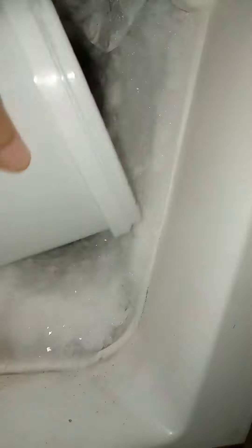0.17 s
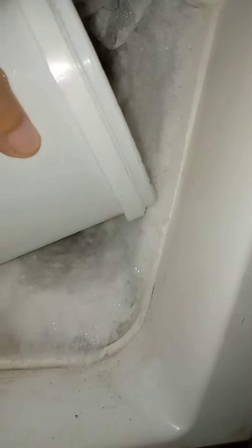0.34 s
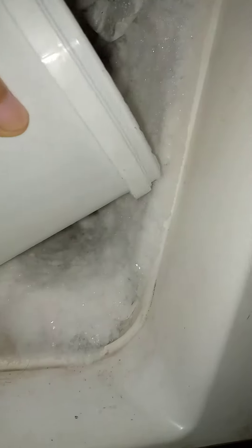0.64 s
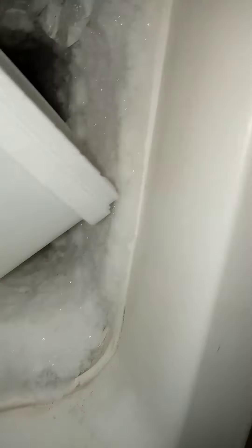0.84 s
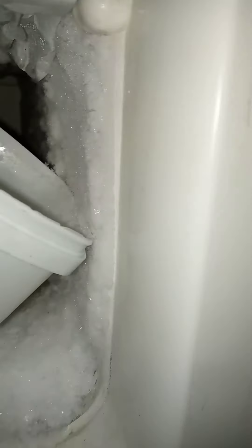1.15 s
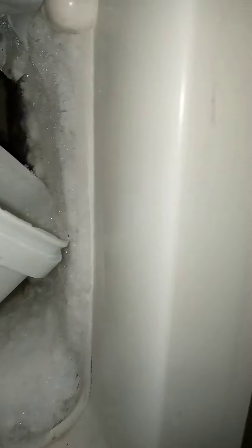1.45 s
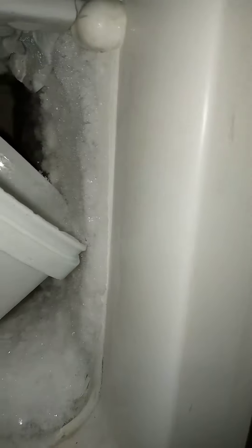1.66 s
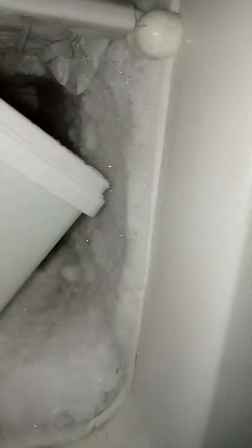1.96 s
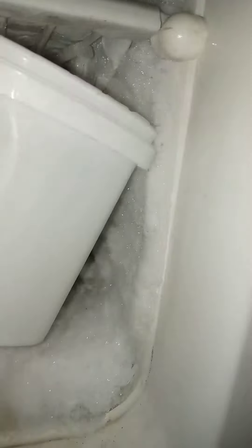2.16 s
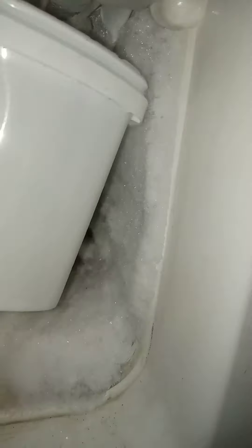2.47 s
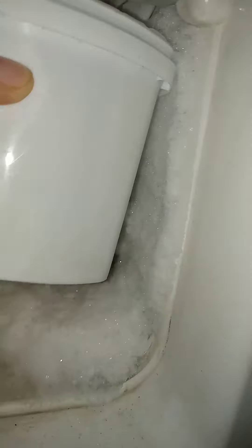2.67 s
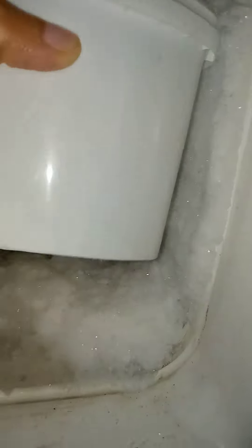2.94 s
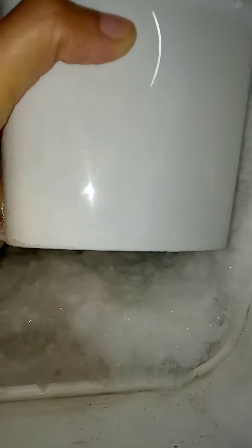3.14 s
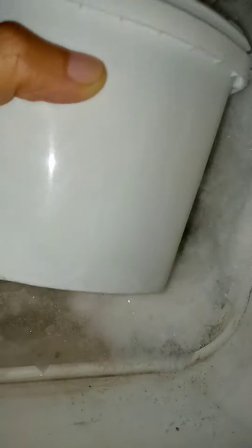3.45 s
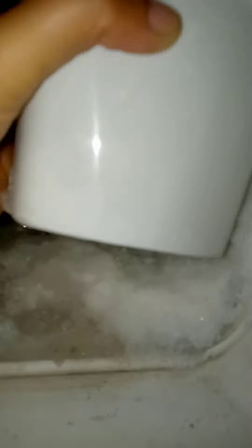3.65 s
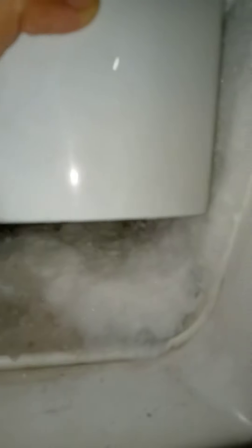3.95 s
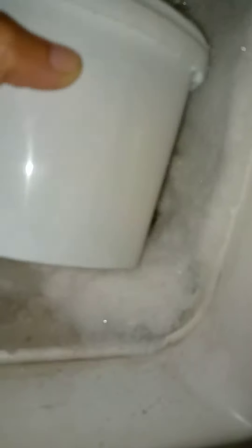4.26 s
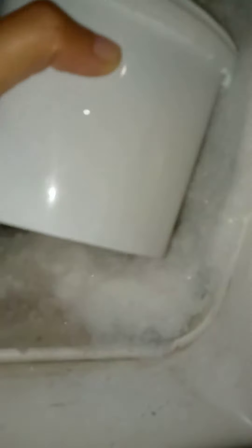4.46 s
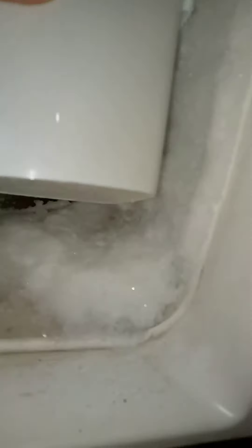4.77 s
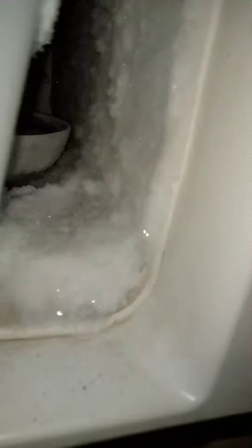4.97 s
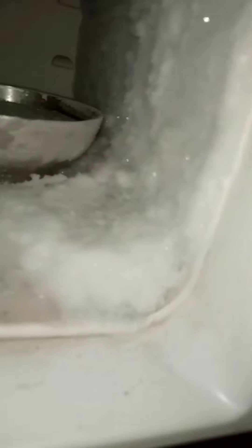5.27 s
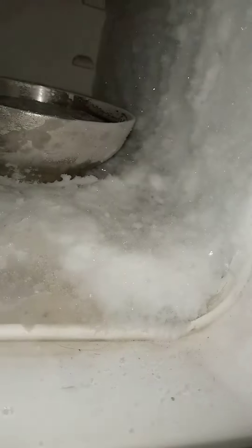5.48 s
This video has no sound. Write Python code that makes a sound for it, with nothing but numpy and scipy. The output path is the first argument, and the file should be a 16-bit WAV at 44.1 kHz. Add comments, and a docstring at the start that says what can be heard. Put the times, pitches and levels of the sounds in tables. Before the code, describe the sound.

Close, gritty bursts of plastic rim crushing ice, with hollow knocks, scattered crumb ticks and quiet pauses above a soft low background hum.

```python
"""Inside a freezer, close to a phone, a light crackling drag of a plastic tub is fading as the scene opens.
Then the tub goes in jerks over thick frost: its rim crushes ice (clumped noise through resonances),
crystals and crumbs tick (short decays), and the hollow tub hums and knocks on solid ice (pushed modes).
Near the end a steel bowl is touched (decaying sines). Throughout, the kitchen answers with decaying
noise, over a steady low hush of air and far machines (coloured noise)."""
import sys
import numpy as np
from scipy import signal
from scipy.fft import rfft, irfft, next_fast_len
from scipy.io import wavfile
from scipy.ndimage import uniform_filter1d, map_coordinates

SR = 44100
rng = np.random.default_rng(int(sys.argv[2]) if len(sys.argv) > 2 else 0)


def wav_out(sig):
    """Save sig, one row per channel (or a flat mono array), as 16-bit PCM at SR to the path in sys.argv[1]."""
    wavfile.write(sys.argv[1], SR, np.round(np.clip(np.atleast_2d(sig).T, -1, 1) * 32767).astype(np.int16))


N = 247401  # samples

# All levels are relative; each source is balanced where it is mixed.
# Pressure of the rim on the frost, one curve per stroke: (time [s], level [dB])
STROKE_CURVES = [
    [(1.818, -36), (1.826, -26.5), (1.84, -26.5), (1.87, -41.5)],
    [(2.178, -53), (2.186, -38.5), (2.226, -34.5), (2.243, -50)],
    [(2.265, -43.5), (2.295, -33.5), (2.325, -35), (2.35, -47.5)],
    [(2.665, -47), (2.689, -37.5), (2.699, -25.5), (2.707, -22.5), (2.717, -40.5), (2.748, -39.5)],
    [(2.756, -31), (2.762, -32), (2.77, -24.5), (2.782, -62)],
    [(2.838, -47), (2.872, -38), (2.888, -65)],
    [(2.915, -46), (2.921, -63), (2.935, -34), (2.945, -55)],
    [(3.712, -40), (3.734, -26.5), (3.752, -40.5), (3.758, -32.5), (3.766, -27.5), (3.772, -51)],
    [(3.778, -46), (3.786, -31.5), (3.798, -40), (3.862, -33.5), (3.868, -59)],
    [(4.405, -58), (4.417, -30.5), (4.441, -31), (4.461, -34), (4.47, -50)],
    [(5.488, -50), (5.5, -35.5), (5.506, -34), (5.515, -60)],
    [(5.573, -24.5), (5.578, -27.5), (5.586, -48), (5.594, -33), (5.608, -46)],
    [(0.236, -30), (0.24, -26), (0.272, -26), (0.278, -40), (0.284, -26.5), (0.315, -53.5)],
    [(0.482, -35), (0.49, -29.5), (0.526, -22.5), (0.54, -31), (0.545, -42)],
    [(2.588, -49.5), (2.622, -29.5), (2.632, -47), (2.64, -31.5), (2.654, -26.5), (2.662, -48)],
    [(3.028, -38), (3.036, -31), (3.07, -41.5), (3.082, -33), (3.118, -43.5), (3.125, -62)],
    [(4.515, -55), (4.535, -35), (4.579, -35.5), (4.589, -43), (4.599, -35.5), (4.639, -33.5), (4.66, -49)],
    [(5.165, -56), (5.169, -49.5), (5.187, -55), (5.203, -42.5), (5.213, -49), (5.221, -48), (5.255, -54.5),
     (5.258, -59)],
]
# The rim brushes the frost lightly: (time [s], length [ms], level [dB])
LIGHT_BRUSHES = [(.045, 31, -59), (0.193, 16.5, -49.5), (0.366, 2.4, -43), (0.576, 4, -38),
                 (0.591, 8.2, -46.5), (0.75, 10, -52), (1.197, 18, -59.5), (1.226, 24, -56),
                 (2.115, 9, -49), (3.172, 52, -48.5), (3.318, 5.1, -40.5), (4.316, 7.8, -48.5),
                 (4.375, 28, -52.5), (4.824, 14, -50), (4.88, 9.9, -42.5)]
BRUSH_RISE_MS, BRUSH_FALL_MS = 7, 3.7  # to climb 14 dB, to drop 12 dB
# Crystals snap or crumbs land: (time [s], level [dB], 60 dB decay [ms])
CRYSTAL_SNAPS = [(0.025, -48, 11), (0.085, -41, 21), (0.222, -23, 22), (0.24, -43, 17), (0.298, -36, 13),
                 (0.348, -41, 15), (0.355, -49, 15), (0.447, -33, 24), (0.475, -31.5, 15.5),
                 (.536, -25.5, 11), (0.72, -49.5, 22), (0.848, -45, 10), (0.855, -45, 32), (0.965, -39, 21),
                 (.976, -37.5, 12), (0.983, -41, 13), (1, -49, 18), (1.03, -56, 10), (1.078, -67, 16),
                 (1.007, -38, 16), (1.49, -56, 48), (1.62, -52.5, 24), (1.683, -55.5, 24),
                 (1.808, -22.5, 23), (1.92, -46.5, 29), (1.937, -45, 26), (2.728, -36, 6.8),
                 (2.76, -29.5, 35), (2.895, -24.5, 65), (2.985, -32.5, 19), (3.02, -29.5, 43),
                 (3.332, -44.5, 19), (3.757, -38, 25), (3.898, -40.5, 16), (4.02, -40, 12.3),
                 (4.258, -44.5, 31), (4.298, -35.5, 24), (4.602, -41, 18), (4.752, -37, 9.3),
                 (4.759, -35.5, 11), (5.432, -39, 38.5), (5.543, -39, 36), (5.563, -27, 25)]
# The touching spot favours a pitch and shakes rim and wall more or less:
# (time [s], favoured pitch [Hz], rim level [dB], wall level [dB])
CONTACT_SPOT = [(.1, 2470, -8.5, 2.5), (.3, 2300, -3.5, 0.5), (.52, 2260, -5.5, 0), (.98, 4780, -9, -4.5),
                (1.22, 2880, -5, 4), (1.82, 1880, -3.5, 3.5), (2.3, 2670, -3.5, 0.5), (2.7, 3190, -6, 0.5),
                (3.04, 2570, -2.5, 3.5), (3.32, 2690, -1, 5.5), (3.749, 2980, -4, 2),
                (3.86, 2570, -3.5, 5.5), (4.26, 2500, -0.5, 5.5), (4.43, 2450, -5.5, -1.5),
                (4.62, 2340, -1.5, 5.5), (4.88, 2330, -1, 6.5), (5.2, 2470, -1, 2), (5.434, 1600, 5.5, 6.5),
                (5.56, 2540, -3.5, 2.5)]
# Spectrum of breaking crystals: (frequency [Hz], level per Hz [dB])
ICE_SPECTRUM = [(1000, -77.5), (1200, -25), (5500, 2.5)]
# Highest treble of the crunch: (time [s], level [dB])
SHEEN_LEVEL = [(4.8, -12), (5.2, 3.5), (5.5, 4.5), (5.56, -1)]
SHEEN_HZ = 11700
# Modes of the tub rim: (frequency [Hz], width [Hz], level [dB])
RIM_MODES = [(1434, 480, 2), (1884, 494, 0.5), (2880, 181, -4), (3235, 587, 4.5), (4670, 496, 8)]
# Modes of the tub wall: (frequency [Hz], width [Hz], level [dB])
WALL_MODES = [(448, 78, 2), (646, 124, -2), (742, 20, -1.5)]
# Modes of the air and floor of the tub: (frequency [Hz], width [Hz], level [dB])
BOOM_MODES = [(140.2, 6.1, 0.5), (187, 47, -11)]
# The tub wall bumps solid ice: (time [s], boom level [dB], knock level [dB], favoured pitch [Hz])
ICE_BUMPS = [(0.223, -67, -21.5, 547), (0.2409, -37.5, -21.5, 490), (1.809, -63, -19.5, 506),
             (2.708, -41.5, -19.5, 510), (2.763, -52, -18, 774), (2.794, -43.5, -50.5, 450),
             (2.899, -38, -20, 720), (3.039, -35, -19.5, 665), (3.86, -39.5, -60, 556),
             (4.636, -33, -30, 466), (4.877, -47, -29.5, 466), (5.169, -50, -55, 450),
             (5.564, -37.5, -19, 674)]
# Touches on the steel bowl: (time [s], level [dB])
BOWL_TOUCHES = [(5.435, -56), (5.503, -60)]
# Tones of the steel bowl: (frequency [Hz], level [dB], 60 dB decay [s])
BOWL_TONES = [(6340, -3, .15), (10400, 11, .045), (11960, 15, .05)]
# Decay of the kitchen's answer: (frequency [Hz], 60 dB decay [s])
KITCHEN_DECAY = [(300, 1), (2000, 1), (3800, 0.34), (7000, 0.55), (14000, 0.48)]
# Spectrum of air and far machines: (frequency [Hz], level per Hz [dB])
HUSH_SPECTRUM = [(25, -30), (121, 8.5), (168, -2.5), (267, 7.5), (603, 4), (1130, -6), (2100, -9),
                 (2920, -18.5), (4300, -22.5), (7000, -24), (16000, -36)]
# Slow course of the hush: (time [s], level [dB])
HUSH_LEVEL = [(0, -54), (1.5, -58), (3.5, -57.5), (5.3, -57.5)]
# Response of the phone microphone: (frequency [Hz], gain [dB])
MIC_RESPONSE = [(4200, 0.5), (5800, 5), (7000, 11), (8200, -2.5), (10900, -17), (13500, -13), (14500, 2),
                (15600, 10), (16100, -34)]
TOP_HZ = 16800  # band limit of the microphone
CLOCK = np.arange(N) / SR  # [s]


def amp(db):
    """Amplitude factor of a level in dB."""
    return 10 ** (np.asarray(db) / 20)


def unit(x):
    """Scale a signal to rms 1."""
    return x / np.sqrt(np.mean(x ** 2) + 1e-20)


def along(points, hz):
    """Read (Hz, value) points on a log frequency axis."""
    f, values = np.transpose(points)
    return np.interp(np.log(hz + 1), np.log(f + 1), values)


def over_time(points):
    """Draw (s, value) points as straight lines over the whole scene."""
    s, values = np.transpose(points)
    return np.interp(CLOCK, s, values)


def filtered(x, response):
    """Pass x through a complex response of frequency."""
    m = next_fast_len(N + SR // 2)
    spectrum = rfft(x, m) * response(np.fft.rfftfreq(m, 1 / SR))
    return irfft(spectrum, m)[..., :N]


def causal(points):
    """Minimum-phase response of (Hz, dB) points, from a folded cepstrum."""
    def response(hz):
        cepstrum = irfft(np.log(amp(along(points, hz))))
        half = len(cepstrum) // 2
        cepstrum[1:half] *= 2
        cepstrum[half + 1:] = 0
        return np.exp(rfft(cepstrum))
    return response


def modes(table):
    """Response of (Hz, width, dB) resonances of one body; they cancel each other in between."""
    def response(f):
        return sum(amp(db) * 1j * f * width / (hz * hz - f * f + 1j * f * width)
                   for hz, width, db in table)
    return response


def wobble(rate):
    """A smooth random curve with rate knots a second."""
    knots = rng.standard_normal(int(N * rate / SR) + 4)
    return map_coordinates(knots, [np.arange(N) * rate / SR])


def patchy(patchy_db, bins, frames):
    """Noise of rms 1 whose colour changes at random from patch to patch."""
    z = signal.stft(rng.standard_normal(N), nperseg=256)[2]
    field = uniform_filter1d(rng.standard_normal(z.shape), size=bins, axis=0)
    field = uniform_filter1d(field, size=frames, axis=1)
    return unit(signal.istft(z * amp(patchy_db * unit(field)), nperseg=256)[1][:N])


def add(line, s, piece):
    """Lay a piece onto the line, starting at s seconds."""
    part = line[max(round(s * SR), 0):][:len(piece)]
    part += piece[:len(part)]


def rung(force, grain, response):
    """Press grain with a force into a response, at the level of the force."""
    return filtered(force * grain, response) / np.std(filtered(grain, response))


def pressure():
    """Force of the contact as felt by the crystals, the rim and the tub wall."""
    rub, snap = np.zeros(N), np.zeros(N)
    for stroke in STROKE_CURVES:
        s, db = np.transpose(stroke)
        rub += amp(np.interp(CLOCK, s, db)) * (CLOCK >= s[0]) * (CLOCK < s[-1])
    for s, length_ms, db in LIGHT_BRUSHES:
        ms = (CLOCK - s) * 1000
        rise_db = 14 * np.minimum(ms, 0) / BRUSH_RISE_MS
        fall_db = 12 * np.maximum(ms - length_ms, 0) / BRUSH_FALL_MS
        rub += amp(db + rise_db - fall_db)
    t = np.arange(SR // 10) / SR
    for s, db, t60_ms in CRYSTAL_SNAPS:
        add(snap, s, amp(db - 60 * 1000 * t / t60_ms))
    s, _, rim_db, wall_db = np.transpose(CONTACT_SPOT)
    crunch = rub + amp(5) * snap
    ring = amp(np.interp(CLOCK, s, rim_db)) * (rub + amp(4.0) * snap)
    shake = amp(np.interp(CLOCK, s, wall_db)) * (rub + amp(2.0) * snap)
    # loosened frost keeps trickling after a bite, fading over about 1/8 s
    loose = signal.lfilter([8 / SR], [1, 8 / SR - 1], crunch)
    landings = (rng.random(N) < 130 / SR) * rng.random(N)  # about 130 crumbs a second
    crumbs = abs(signal.fftconvolve(landings, amp(-60 * t / 0.0049))[:N])
    # a light, crackling drag is fading as the scene opens
    drag = amp(-53.5 - 60 * CLOCK / 2.9) * (0.68 + 6 * crumbs)
    return crunch + drag + amp(-4.5) * loose * crumbs, ring + amp(-5.5) * drag, shake


def scrape():
    """Crystals break in clumps a few milliseconds long and ring the rim; jerks shake the tub wall."""
    crunch, ring, shake = pressure()
    clumps = amp(2.5 * wobble(350) + 2.5 * wobble(2500))
    grit = unit(clumps * patchy(patchy_db=2.0, bins=4, frames=4))
    crystals = rung(crunch, grit, causal(ICE_SPECTRUM))
    treble = filtered(crystals, lambda hz: 1 / (1 + (SHEEN_HZ / (hz + 1)) ** 10))
    crystals = crystals + (amp(over_time(SHEEN_LEVEL)) - 1) * treble

    s, pitch_hz, _, _ = np.transpose(CONTACT_SPOT)
    contact_hz = np.interp(CLOCK, s, pitch_hz)
    rim = 0
    for hz, width, db in RIM_MODES:
        # a mode weakens with each octave between it and the favoured pitch, and flickers
        near_db = db - 9 * abs(np.log2(hz / contact_hz)) + 2.3 * wobble(40)
        narrow, wide = modes([(hz, width, 0)]), modes([(hz, 4 * width, 0)])
        rim = rim + rung(ring * amp(near_db), grit, lambda f: narrow(f) * wide(f))

    jerks = unit(clumps * rng.standard_normal(N))
    # a rubbed wall gives little outside its modes
    steep = signal.butter(4, [300, 830], "band", fs=SR, output="sos")
    wall = rung(shake, jerks, lambda hz: modes(WALL_MODES)(hz) * signal.sosfreqz(steep, hz, fs=SR)[1])
    boom = rung(shake, jerks, modes(BOOM_MODES))
    return amp(-1.0) * crystals + amp(-4.5) * rim + amp(-6.0) * wall + amp(-16.0) * boom


def bumps():
    """A soft push about a millisecond long rings the tub; the hand on it makes the hum waver."""
    low, knock = np.zeros(N), 0
    push = np.hanning(round(0.0015 * SR))
    for s, boom_db, _, _ in ICE_BUMPS:
        add(low, s, amp(boom_db + 36.5) * push)
    for hz, width, db in WALL_MODES:
        high = np.zeros(N)
        for s, _, knock_db, near_hz in ICE_BUMPS:
            # a mode weakens with each octave from the favoured pitch
            add(high, s, amp(knock_db + 16 - 32 * abs(np.log2(hz / near_hz))) * push)
        knock = knock + filtered(high, modes([(hz, width, db)]))
    hum = amp(0.83 * wobble(17)) * filtered(low, modes(BOOM_MODES))
    return hum + knock


def bowl():
    """The steel bowl rings briefly as decaying sines, damped by the frost it sits in."""
    out, t = np.zeros(N), np.arange(SR // 5) / SR
    for s, db in BOWL_TOUCHES:
        for hz, level_db, t60 in BOWL_TONES:
            # each touch excites the tones a little differently
            tone_db = db + level_db + rng.normal(0, 2.5) - 60 * t / t60
            add(out, s, amp(tone_db) * np.sin(2 * np.pi * hz * t))
    return out


def kitchen(x):
    """Diffuse answer: the energy at each frequency dies at its own speed, carried by fresh noise."""
    hz, t, z = signal.stft(x, SR, nperseg=512)
    keep = amp(-60 * t[1] / along(KITCHEN_DECAY, hz)) ** 2  # energy left after one frame
    energy = [signal.lfilter([0, 1 - k], [1, -k], row) for k, row in zip(keep, abs(z) ** 2)]
    noise = signal.stft(rng.standard_normal(N), SR, nperseg=512)[2]
    return signal.istft(np.sqrt(np.abs(energy)) * noise / np.std(noise), SR, nperseg=512)[1][:N]


def hush():
    """Far machines and moving air: patchy noise, coloured and slowly changing in level."""
    noise = patchy(patchy_db=1.5, bins=3, frames=20)
    air = unit(filtered(noise, lambda hz: amp(along(HUSH_SPECTRUM, hz))))
    return amp(over_time(HUSH_LEVEL)) * air


def scene():
    """Tub and bowl close by, the kitchen answering them, and the hush behind."""
    near = scrape() + bumps() + bowl()
    near = near + amp(-15) * kitchen(near)
    # a small tub radiates no deep bass
    near = filtered(near, lambda hz: (1j * hz / (75 + 1j * hz)) ** 4)
    return (near + hush())[None]


def record(dry):
    """The phone's port resonates in the treble; nothing is kept above the band limit."""
    return filtered(dry, lambda hz: causal(MIC_RESPONSE)(hz) * (hz < TOP_HZ))


dry = scene()
out = record(dry)
wav_out(out)
```